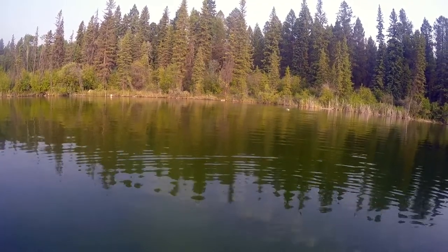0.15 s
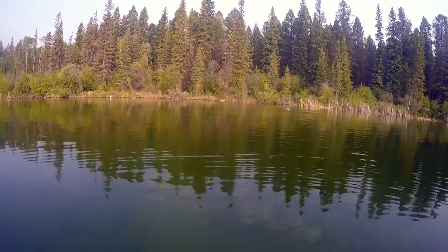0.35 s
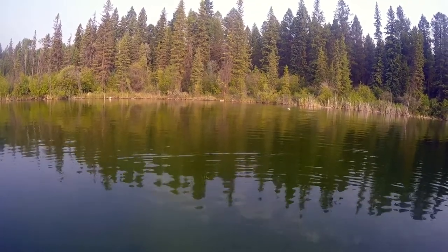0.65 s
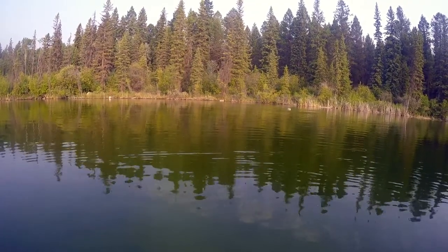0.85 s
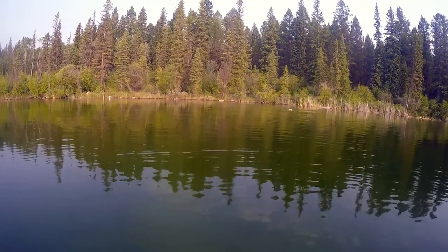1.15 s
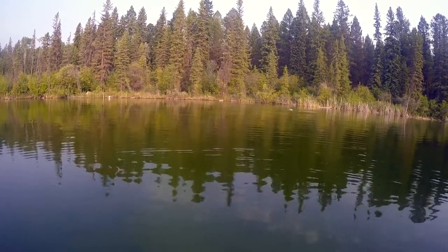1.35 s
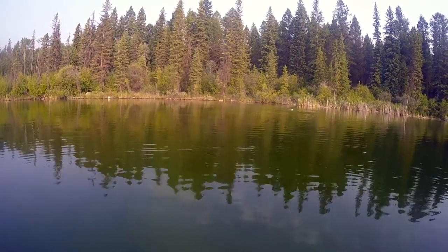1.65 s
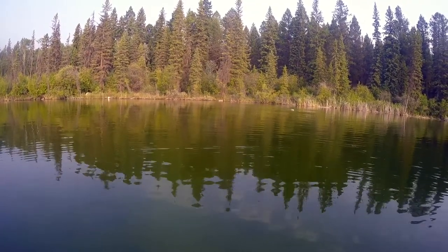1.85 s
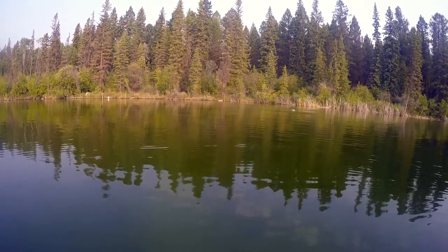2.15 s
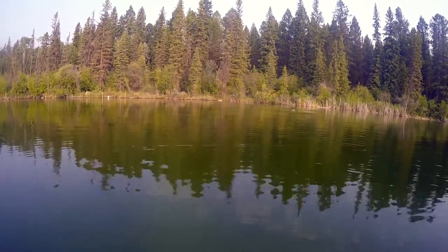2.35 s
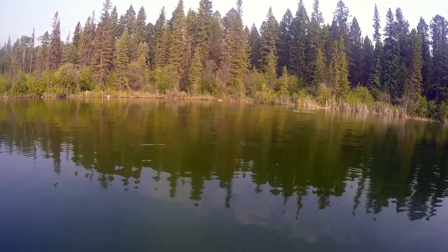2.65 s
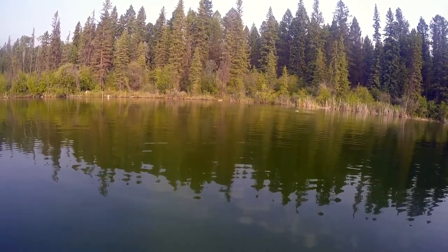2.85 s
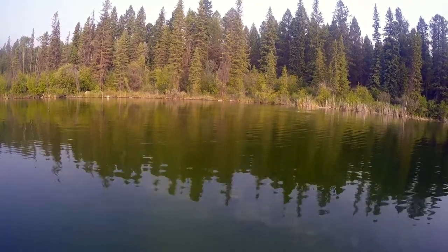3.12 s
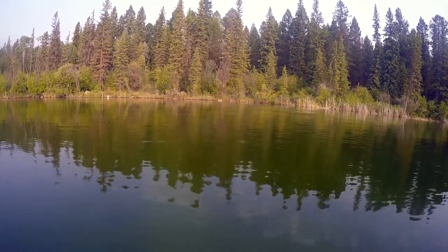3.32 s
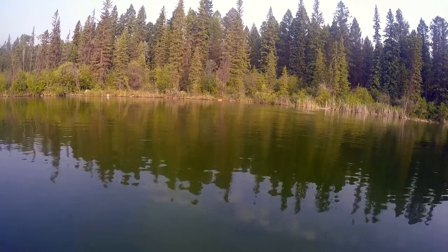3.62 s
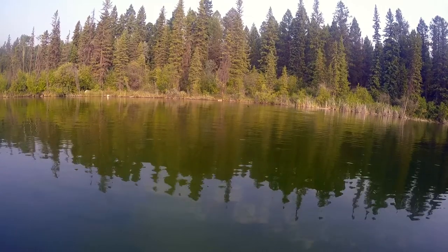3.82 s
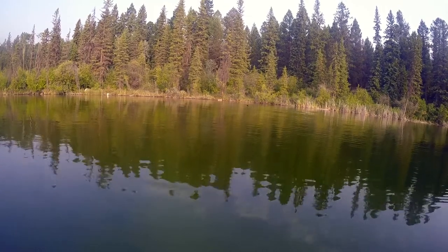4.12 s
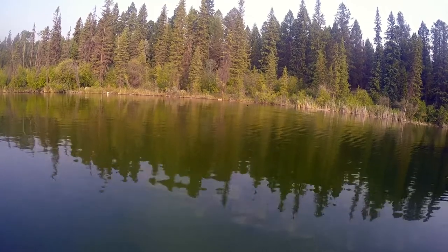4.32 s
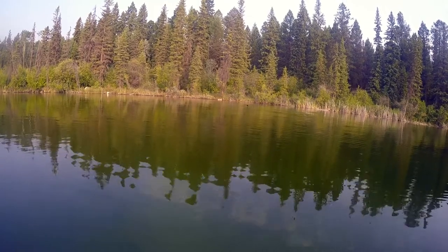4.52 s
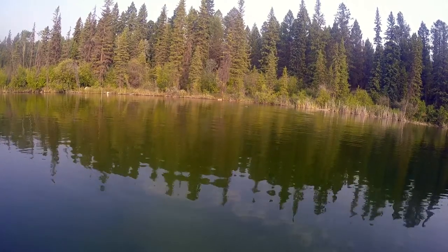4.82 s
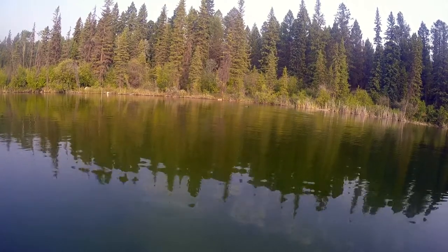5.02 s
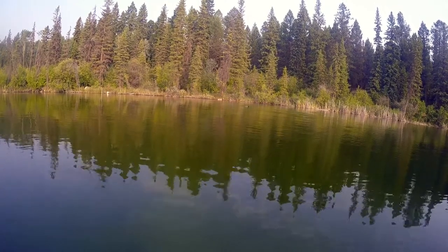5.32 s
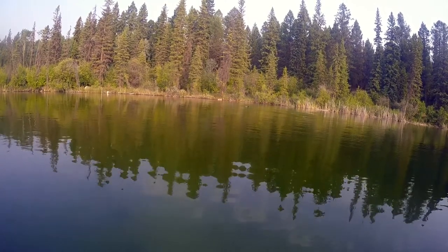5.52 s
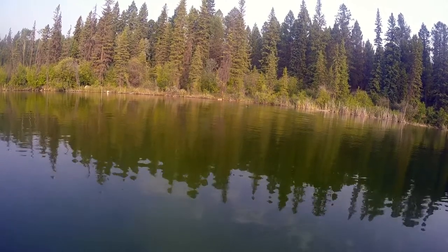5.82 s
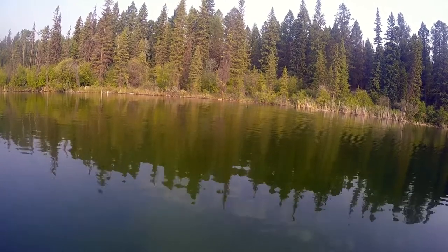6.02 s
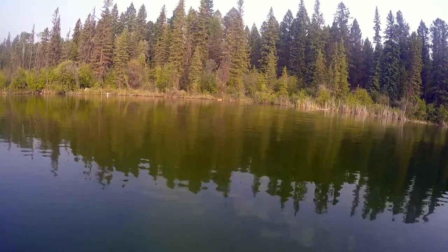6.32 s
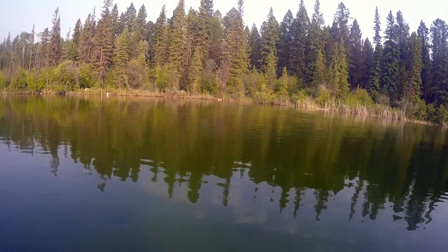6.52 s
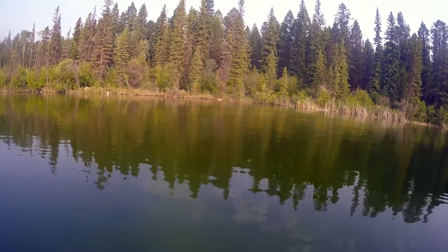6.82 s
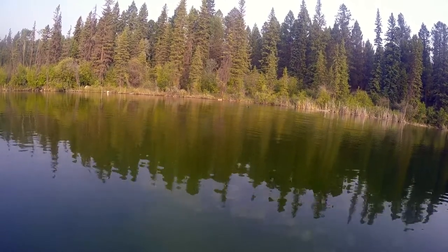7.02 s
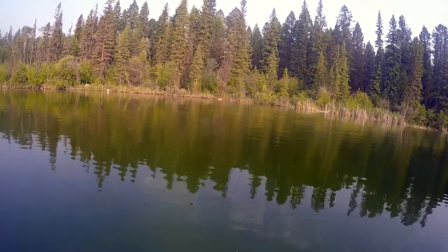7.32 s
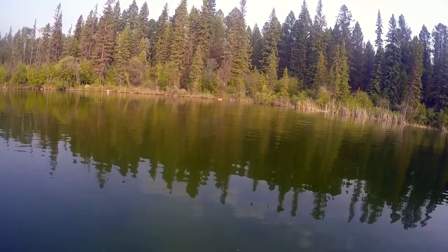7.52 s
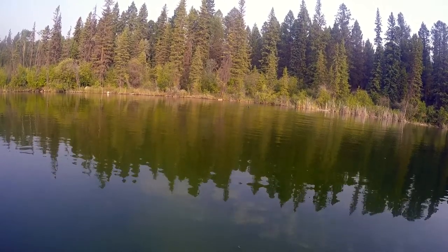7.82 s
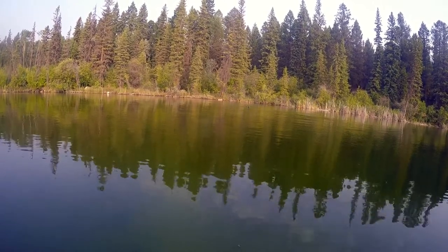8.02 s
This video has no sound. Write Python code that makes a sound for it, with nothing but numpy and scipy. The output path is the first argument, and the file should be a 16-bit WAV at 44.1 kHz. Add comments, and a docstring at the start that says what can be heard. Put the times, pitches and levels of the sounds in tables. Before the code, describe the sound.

Heard from a small boat: a low loon and a higher loon take turns, each starting with a short growl or scoop and breaking into fast laughing quavers, their tails blurred by the forest shore. Bright water drips run throughout, close and irregular, with low hull bumps and tiny gurgles. The birds stop past the middle; the echo fades and only dripping, lapping, quiet air hiss and a very faint high electronic chirping remain.

```python
"""On a still, forest-lined lake two loons trade tremolo calls, heard from a small boat.
Each voice sweeps a harmonic series through throat resonances: low growls, then a quavering run,
with a dull scattered tail from the trees. Drips are impacts followed by ringing bubbles; swarms of bubbles lap.
Narrow-band noise makes the hollow hull boom, short chirps make a faint camera whine, and still air hisses."""
import sys
import numpy as np
from scipy import signal
from scipy.fft import rfft, irfft
from scipy.io import wavfile

SR = 44100
rng = np.random.default_rng(int(sys.argv[2]) if len(sys.argv) > 2 else 0)


def wav_out(sig):
    """Save sig, one row per channel (or a flat mono array), as 16-bit PCM at SR to the path in sys.argv[1]."""
    wavfile.write(sys.argv[1], SR, np.round(np.clip(np.atleast_2d(sig).T, -1, 1) * 32767).astype(np.int16))


N = 359856
TIME = np.arange(N) / SR
# the coarser time grid on which the notes are shaped (s)
BEAT = np.linspace(0, N / SR, N // 16)


def amp(db):
    """Level to amplitude: 20 dB is a factor of ten."""
    return 10 ** (np.asarray(db) / 20)


def unit(x):
    """Normalization to an rms of 1."""
    return x / np.sqrt(np.mean(x ** 2) + 1e-20)


def read(points, hz):
    """Interpolation of a spectrum on a log-frequency axis."""
    f, value = np.transpose(points)
    return np.interp(np.log(hz + 1), np.log(f + 1), value)


def add(mix, start_s, sound):
    """Superposition: a sound is summed into the mix from its start."""
    part = mix[max(round(start_s * SR), 0):][:len(sound)]
    part += sound[:len(part)]


def noise(spectrum):
    """Spectral shaping: white noise is weighted by frequency and set to rms 1."""
    white = rfft(rng.standard_normal(N))
    weight = amp(read(spectrum, np.fft.rfftfreq(N, 1 / SR)))
    return unit(irfft(white * weight, N))


def wander(rate_hz):
    """Low-passed randomness: a smooth fluctuation of rms 1 under a Gaussian spectrum."""
    white = rfft(rng.standard_normal(N))
    weight = np.exp(-(np.fft.rfftfreq(N, 1 / SR) / rate_hz) ** 2)
    return unit(irfft(white * weight, N))


def gate(t, start, end, edge):
    """Smooth windowing: opens at start and shuts at end, with soft edges (all s)."""
    opening = 1 + np.tanh((t - start) / edge)
    closing = 1 + np.tanh((end - t) / edge)
    return opening * closing / 4


# Spectrum of still air and hiss, only its shape counts: frequency_hz [Hz], density_db [dB per Hz, relative]
AIR_SPECTRUM = [(12, -1.5), (29, 0), (45, -4.5), (75, -11.5), (150, -15.5), (300, -22.5), (550, -26.5),
                (900, -22.5), (1450, -30), (2000, -26.5), (2500, -30), (5000, -33.5), (9000, -39.5),
                (15000, -43)]


def still_air(level_db=-58):
    """Stationary broadband noise, its level fluctuating slightly."""
    return amp(level_db + .5 * wander(4)) * noise(AIR_SPECTRUM)


def camera_whine(pitch_hz=8550, first_s=0.018):
    """Periodic tone bursts: a faint electronic chirp under a Gaussian envelope, thirty times a second."""
    period_s, width_s, level_db = 1 / 29.97, .0034, -75
    since = (TIME - first_s + period_s / 2) % period_s - period_s / 2
    envelope = np.exp(-(since / width_s) ** 2)
    return amp(level_db) * envelope * np.sin(2 * np.pi * pitch_hz * since)


# Ripples meeting the hull, also played by lapping(): middle_s [s], half_length_s [s],
# gurgle_db [dB], boom_db [dB, before the trim in hull()]
HULL_RIPPLES = [ (.17, .039, -63, -67), (1.87, .04, -70, -63), (2.85, .03, -75, -61),
                (3.285, .025, -60, -56), (4.08, .06, -76, -62.5), (4.28, .03, -68, -66),
                (4.63, .05, -64.5, -72), (4.92, .04, -76, -60), (5.36, .06, -77, -57),
                (5.81, .03, -73, -65), (6.13, .09, -67, -71), (7.32, .07, -76, -58),
                (7.672, .033, -56.5, -51), (7.82, .06, -66.5, -65), (8.057, .038, -67.5, -66)]


def hull(rocking_db=-68, sway_db=2.5, lag_s=.025, ring_s=.035, trim_db=-2.5):
    """Cavity resonance: the hollow hull booms near 100 Hz as water rocks it, louder just after each ripple."""
    boom = noise([(55, -50), (78, -10.5), (88, -1), (106, 3), (118, -16), (170, -49), (400, -88)])
    pushes = sum(amp(boom_db) * np.exp(-((TIME - s - lag_s) / (half + ring_s)) ** 2)
                 for s, half, _, boom_db in HULL_RIPPLES)
    rocking = amp(rocking_db + sway_db * wander(4))
    return boom * amp(trim_db) * (rocking + pushes)


def bubble(hz, life, rise=0.063, swell_cycles=1.65):
    """Bubble resonance: trapped air swells into its ring, decays, and rises in pitch near the surface."""
    t = TIME[:SR // 16]
    swell = 1 - np.exp(-(t * hz / swell_cycles) ** 0.7)
    ring = swell * np.exp(-(t / life) ** 1.34)
    glide_hz = hz * (1 + rise * np.tanh(t / life - .55))
    return ring / ring.max() * np.sin(2 * np.pi * np.cumsum(glide_hz) / SR)


def lapping(bubbles_per_s=45, calm_db=-74):
    """Superposed bubble resonances: a steady swarm of small bubbles, louder at each ripple on the hull."""
    swarm = np.zeros(N)
    for hz in np.geomspace(520, 1500, 20):  # the birth rate applies to each pitch
        strengths = amp(3 * rng.standard_normal(N))
        births = (rng.random(N) < bubbles_per_s / SR) * strengths
        swarm += signal.oaconvolve(births, bubble(hz, 4 / hz, rise=0.11))[:N]
    gurgles = sum(amp(gurgle_db) * np.exp(-((TIME - s) / half) ** 2)
                  for s, half, gurgle_db, _ in HULL_RIPPLES)
    return unit(swarm) * (amp(calm_db) + gurgles)


# Modes that an impact rings: pitch_hz [Hz], level_db [dB, relative], t60_s [s to decay 60 dB]
KNOCK_MODES = [(700, 1, 0.0049), (1226, 8, 0.0066), (1680, 2.5, 0.014), (1900, 1.5, 0.042),
               (1880, -31.5, 0.037), (2744, -4.5, 0.027), (4800, -3.5, .006), (6550, -12.5, 0.018)]


def knocked(clicks):
    """Modal resonance: clicks ring the decaying modes of the boat and the camera's case."""
    t = TIME[:SR // 8]
    ring = sum(amp(db - 60 * t / t60) * np.sin(2 * np.pi * hz * t) for hz, db, t60 in KNOCK_MODES)
    return signal.oaconvolve(clicks, ring / abs(ring).max())[:N]


def faint_drips(count=48, middle_hz=2900, octaves=.9, bubble_db=-58, impact_db=-48, range_db=4.5, cycles=11):
    """Size scaling: small drips at random moments, whose higher-pitched bubbles die sooner."""
    when, size, loud, hard = rng.uniform(-1, 1, (count, 4)).T
    start_s = (np.arange(count) + (1 + when) / 2) / count * N / SR
    hz = middle_hz * 2 ** (octaves * size)
    return list(zip(start_s, hz, bubble_db + range_db * loud, cycles / hz, impact_db + range_db * hard))


# The loudest drips, before the scatter off the boat: start_s [s], pitch_hz [Hz], bubble_db [dB, envelope peak],
# life_s [s], impact_db [dB, before softening, ringing and bass cut]
LOUD_DRIPS = [ (.053, 2770, -42.5, .004, -38), (.0765, 1930, -38.5, .005, -46),
              (.3701, 1320, -32.5, .010, -31.5), (.7531, 2950, -50.5, .0075, -41),
              (.861, 2020, -43.5, .012, -43), (.994, 1590, -46, .0062, -48),
              (1.062, 2032, -35.5, .003, -37), (1.108, 2590, -49.5, .0056, -35.5),
              (1.2661, 2020, -41, .007, -58), (1.396, 2030, -38, .0035, -40),
              (1.78, 1615, -34.5, .0029, -34), (2.0209, 1145, -23.5, .0075, -30.5),
              (2.1127, 1894, -39, .0027, -42), (2.4783, 3865, -48.5, .003, -35),
              (2.6983, 2560, -46, .0043, -42), (2.958, 1634, -40, .0039, -45),
              (3.632, 2737, -44, .0028, -36), (3.66, 1936, -33, .0036, -36),
              (3.7911, 1910, -29, .0077, -39.5), (3.877, 793, -46.5, .015, -56),
              (3.9336, 1986, -32, .004, -30.5), (4.0243, 1328, -40, .007, -46),
              (4.086, 3620, -44.5, .002, -36), (4.251, 5900, -49, .0027, -40),
              (4.433, 1931, -30, .0033, -35), (4.7638, 2900, -51, .0026, -37.5),
              (4.973, 3992, -49, .0025, -41.5), (5.2284, 2733, -52, .004, -56),
              (5.325, 810, -49, .011, -59), (5.379, 2840, -58, .003, -42), (5.446, 2073, -52.5, .011, -58),
              (5.4965, 1525, -60, .0027, -38), (5.670, 4500, -54.5, .004, -44.5),
              (5.713, 1102, -47, .012, -70), (5.796, 590, -52.5, .017, -67), (5.915, 2700, -55, .003, -41),
              (5.9675, 833, -34.5, .0098, -48), (6.19, 1133, -35.5, .0099, -43),
              (6.325, 3850, -55, .003, -43.5), (6.397, 4400, -53.5, .003, -40.5),
              (6.4249, 2850, -41, .0025, -36.5), (6.446, 2860, -46, .0053, -37.5),
              (6.4755, 3010, -46, .0043, -37), (6.5357, 1247, -25, .0036, -38.5),
              (6.782, 1334, -37.5, .011, -33.5), (6.8605, 4260, -49, .0036, -38),
              (6.8927, 2430, -44, .0018, -38.5), (6.9185, 2790, -43, .0022, -42.5),
              (7.056, 2180, -51.5, .007, -41), (7.1494, 1700, -50, .0016, -40.5),
              (7.2242, 1926, -23.5, .007, -26.5), (7.2835, 6370, -55, .0027, -37.5),
              (7.5219, 1894, -31, .0051, -31), (7.669, 2880, -39.5, .003, -38.5),
              (7.7787, 1920, -32, .0058, -35), (7.7884, 2670, -46.5, .0044, -33),
              (7.8893, 4530, -52, .0022, -37), (8.131, 3850, -50, .0027, -39)]


def drips(specks_per_s=40, speck_db=-61, spray_db=-23, near_db=-21, hardness=14):
    """Impact and bubble radiation: a knock with a little spray, then a bubble; tiny specks fall in between."""
    t = TIME[:SR // 50]
    speck_levels = speck_db + 6.9 * np.minimum(rng.exponential(1, N), 2)
    clicks = (rng.random(N) < specks_per_s / SR) * amp(speck_levels)
    bubbles = np.zeros(N)
    for start_s, hz, bubble_db, life, impact_db in LOUD_DRIPS + faint_drips():
        impact = amp(spray_db) * rng.standard_normal(len(t)) * np.exp(-t / 0.0065)
        impact[0] = 1
        # large drops trap long-lived bubbles and land with a softer blow
        soft = signal.butter(2, np.clip(hardness / life, 500, SR / 4), fs=SR)
        add(clicks, start_s, amp(impact_db) * signal.lfilter(*soft, impact))
        add(bubbles, start_s + 0.00048, amp(bubble_db) * bubble(hz, life))
    # impacts this small radiate almost no bass
    no_bass = signal.butter(3, 470, "high", fs=SR, output="sos")
    direct = signal.sosfilt(no_bass, knocked(clicks)) + bubbles
    # the sides of the boat throw back a brief scatter
    t = TIME[:SR // 6]
    scatter = rng.standard_normal(len(t)) * amp(-60 * t / 0.25) * (t > .003)
    scatter /= np.linalg.norm(scatter)
    return direct + amp(near_db) * signal.oaconvolve(direct, scatter)[:N]


def forest(x, t60, build, wet_db):
    """Diffuse scattering: trunks along the shore return a call as a long, dull tail."""
    t = TIME[:3 * SR]
    taps = rng.standard_normal(len(t)) * amp(-60 * t / t60) * (1 - np.exp(-t / build))
    dull = signal.butter(2, 1900, fs=SR, output="sos")
    tail = signal.sosfilt(dull, taps / np.linalg.norm(taps))
    return amp(wet_db) * signal.fftconvolve(x, tail)[:N]


JITTER_CLEAR, JITTER_BREAK, JITTER_GROWL = .0018, .0045, .007  # rms unsteadiness, as a share of the pitch
FADE_DB_PER_HZ = .045  # a quaver that falls short in pitch is weaker too
FIRST_FLAT_HZ = 16  # the first quaver of a phrase is a little flat


def quaver(top, hz, db, before, after, bright_db, sag, width, sag_db, jitter=JITTER_CLEAR):
    """Coupled pitch and effort: both sag around the top. A note is (pitch, effort, brightness, jitter)."""
    slack = 1 - np.exp(-abs((BEAT - top) / width) ** 2.5)
    effort = amp(db - sag_db * slack) * gate(BEAT, top - before, top + after, edge=.0014)
    return hz * (1 - sag * slack), effort, bright_db, jitter


def growl(middle, length, hz, rise_hz, db, bright_db):
    """Frequency glide: a short upward slide in the low register, loudest at its middle."""
    u = np.clip((BEAT - middle) / length * 2, -1, 1)
    effort = amp(db - 5.9 * u ** 2) * gate(BEAT, middle - length / 2, middle + length / 2, edge=.003)
    return hz + rise_hz * u / 2, effort, bright_db, JITTER_GROWL


def swoop(trough, end, trough_hz, end_hz, db, bright_db, lead=.029, dip_db=12, entry=.3):
    """Register break: the upper register dips, then swells as it climbs to the tremolo."""
    turn = np.clip((BEAT - trough) / max(end - trough, lead), -1, 1)
    climb = np.sin(turn * 1.3) ** 2
    climb = np.minimum(climb / np.interp(end, BEAT, climb), 1)
    swell = np.where(BEAT > trough, climb ** .6, entry * climb)
    effort = amp(db - dip_db * (1 - swell)) * gate(BEAT, trough - lead, end, edge=.003)
    return trough_hz + (end_hz - trough_hz) * climb, effort, bright_db, JITTER_BREAK


def tremolo(first, count, period, delay, hz, fall_hz, db, bright_db, carry, opening_db):
    """Periodic modulation: the closing quavers of a phrase come later, flatter, weaker. Rows: top_s, pitch_hz,
    level_db, bright_db."""
    k = np.arange(round(count))
    tired = carry ** (k[-1] - k)
    flat_hz = fall_hz * tired + FIRST_FLAT_HZ * (k == 0)
    return np.transpose([first + k * period + delay * tired, hz - flat_hz,
                         db - FADE_DB_PER_HZ * flat_hz, bright_db + opening_db * k])


# Levels and brightness of all notes are nominal, before the voice is shaped in loon().
# Tremolo phrases of the lower loon, before flattening and fading: first_top_s [s], quavers [count],
# period_s [s], last_delay_s [s], pitch_hz [Hz], last_fall_hz [Hz], level_db [dB], bright_db [dB],
# cracked [closing quavers that crack]
LOWER_PHRASES = [ (.050, 3, .1035, .009, 1180, 51, -33.3, -4, 3),
                 (1.326, 6, .101, .058, 1172, 147, -32.2, -1, 2),
                 (2.751, 6, .1025, .009, 1190, 120, -31.5, -2, 2),
                 (4.190, 5, .1037, .011, 1192, 29, -32, -4.5, 2)]
# Its last soft hoot: top_s [s], pitch_hz [Hz], level_db [dB], before_s [s], after_s [s], bright_db [dB]
LOWER_HOOT = (5.745, 795, -41, .018, .033, -1.5)


def low_notes(scoop_lead=.107, crack_s=.019, crack_lead=.018, last_lead=.011, half=.051):
    """Register breaks: the lower loon scoops to a soft held note, quavers, and cracks into its last quavers."""
    arch = dict(sag=.23, width=.035, sag_db=14)
    notes = [quaver(*LOWER_HOOT, sag=.12, width=.035, sag_db=9)]
    for *phrase, cracked in LOWER_PHRASES:
        run = tremolo(*phrase, carry=.08, opening_db=-.5)
        first, bright_db = run[0, 0], run[0, 3]
        notes.append(growl(first - scoop_lead, length=.041, hz=815, rise_hz=175, db=-37.3, bright_db=bright_db))
        notes.append(growl(first - .067, length=.038, hz=925, rise_hz=12, db=-47, bright_db=bright_db))
        for k, (top, hz, db, bright_db) in enumerate(run):
            cracks = k >= len(run) - round(cracked)
            lead = crack_lead if cracks else half
            if k == len(run) - 1:
                lead = last_lead
            notes.append(quaver(top, hz, db, lead, .051, bright_db, **arch))
            if cracks:
                notes.append(growl(top - lead - crack_s / 2, crack_s, hz=765, rise_hz=175, db=-39,
                                   bright_db=bright_db))
    return notes


# Tremolo phrases of the higher loon, before flattening and fading: first_top_s [s], quavers [count],
# period_s [s], last_delay_s [s], pitch_hz [Hz], last_fall_hz [Hz], level_db [dB], bright_db [dB]
HIGHER_PHRASES = [ (.711, 4, .0965, .017, 1284, 82, -30.8, -6.3),
                  (1.981, 4, .1, .017, 1300, 122, -30.5, -6.8),
                  (3.367, 4, .1005, .015, 1300, 132, -30.2, -2.3),
                  (4.611, 4, .097, .017, 1312, 72, -29.9, -2.4)]
# Growl and swoop before each: growl_middle_s [s], growl_hz [Hz], growl_rise_hz [Hz], trough_s [s], end_s [s],
# trough_hz [Hz], end_hz [Hz], end_level_db [dB, before the gate]
HIGHER_WINDUPS = [ (.612, 705, 45, .659, .721, 850, 1095, -33.5),
                  (1.840, 735, 240, 1.928, 1.973, 860, 1130, -34),
                  (3.245, 710, 190, 3.320, 3.337, 1030, 1130, -38),
                  (4.505, 725, 130, 4.562, 4.606, 865, 1120, -35)]
# Its last soft hoot: top_s [s], pitch_hz [Hz], level_db [dB], before_s [s], after_s [s], bright_db [dB]
HIGHER_HOOT = (5.036, 975, -38, .048, .08, -6.5)


def high_notes(growl_s=.044, half=.052, release=.049, last_release=.07):
    """Register jump: the higher loon growls, swoops, and quavers, opening its bill as it goes."""
    arch = dict(sag=.215, width=.034, sag_db=18.5)
    notes = [quaver(*HIGHER_HOOT, sag=.16, width=.033, sag_db=13)]
    for phrase, windup in zip(HIGHER_PHRASES, HIGHER_WINDUPS):
        middle, growl_hz, rise_hz, trough, jump, *climb = windup
        run = tremolo(*phrase, carry=.35, opening_db=1.6)
        top, hz, db, bright_db = run[0]
        notes.append(growl(middle, growl_s, growl_hz, rise_hz, db=-44, bright_db=-9))
        notes.append(swoop(trough, jump, *climb, bright_db=bright_db - .5))
        # the first quaver starts roughly, straight from the swoop
        notes.append(quaver(top, hz, db - 1, top - jump, release, bright_db, jitter=JITTER_BREAK, **arch))
        for top, hz, db, bright_db in run[1:]:
            after = last_release if top == run[-1, 0] else release
            notes.append(quaver(top, hz, db, half, after, bright_db, **arch))
    return notes


# Resonance of each bird's throat and bill: frequency_hz [Hz], gain_db [dB, before the upper-harmonic tilt]
LOWER_THROAT = [(550, -8), (750, -15.5), (950, -1.5), (1170, -2), (1500, -7), (1900, -19.5), (2350, -17.5),
                (2800, -24.5), (3500, -30.5), (4700, -32), (5850, -40.5), (7000, -48.5), (9500, -62)]
HIGHER_THROAT = [(600, -21), (850, -4.5), (1050, -5.5), (1270, -5), (1480, -8), (1750, -29), (2150, -21.5),
                 (2550, -37), (3000, -19), (3800, -23), (5050, -19), (6000, -26), (7600, -27.5),
                 (9500, -47)]


def loon(notes, throat, octave_db, top_db, effort_share):
    """Source-filter voice: notes join into one line whose harmonics sweep through the throat's resonances."""
    pitches, efforts, brights, jitters = (np.array(column) for column in zip(*notes))
    # the strongest note at each moment leads the pitch
    shares = (efforts + 1e-12) / (efforts + 1e-12).sum(0)
    hz = np.interp(TIME, BEAT, (shares * pitches).sum(0))
    effort = np.interp(TIME, BEAT, efforts.sum(0))
    # pitch is steadiest in clear quavers, rougher in breaks and growls
    jitter = np.interp(TIME, BEAT, jitters @ shares) * wander(300)
    phase = 2 * np.pi * np.cumsum(hz * (1 + jitter)) / SR
    # the low register is grainy in level
    shimmer = amp(np.interp(hz, [780, 1050], [2., .35]) * wander(130))
    # upper harmonics follow the bill's opening and the pitch, and shrink as effort drops
    upper_db = np.interp(TIME, BEAT, brights @ shares) + octave_db * np.log2(hz / 1200)
    upper_db += effort_share * (20 * np.log10(effort + 1e-4) + 35)
    voice = np.zeros(N)
    for k in range(1, 8):
        harmonic_db = read(throat, k * hz) + (k > 2) * upper_db + (k > 4) * top_db
        harmonic_db += np.log(k) * wander(60)
        voice += amp(harmonic_db) * np.sin(k * phase)
    rasp = amp(-32) * noise(throat)
    return effort * shimmer * (np.sqrt(2) * voice + rasp)


def scene():
    """Superposition of all sources and the birds' echo, the same in both ears."""
    near = still_air() + camera_whine() + hull() + lapping() + drips()
    low = loon(low_notes(), LOWER_THROAT, octave_db=3.5, top_db=-1.5, effort_share=.5)
    high = loon(high_notes(), HIGHER_THROAT, octave_db=-10.5, top_db=-10, effort_share=.28)
    echo = forest(low, t60=2.2, build=0.074, wet_db=-13.5)
    echo += forest(high, t60=2.64, build=0.077, wet_db=-16)
    mix = near + echo + low + high
    return np.array([mix, mix])


def record(dry, edge_hz=15350):
    """Band limiting: a linear-phase low-pass removes the highest treble."""
    lowpass = signal.firwin(511, edge_hz, window=("kaiser", 9), fs=SR)
    return signal.oaconvolve(dry, lowpass[None], "same")


dry = scene()
out = record(dry)
wav_out(out)
```